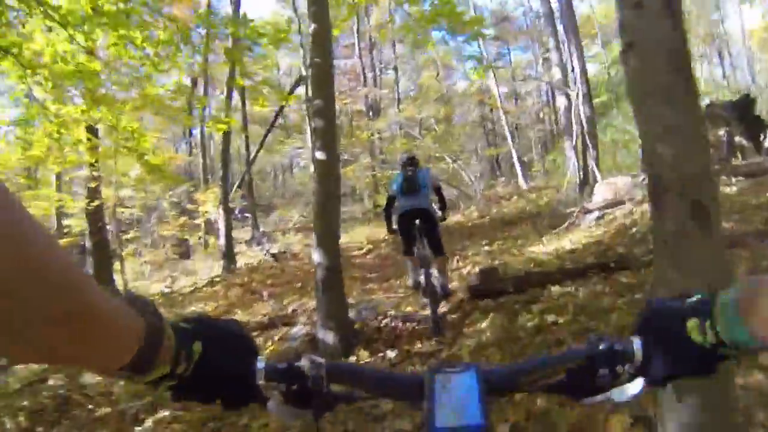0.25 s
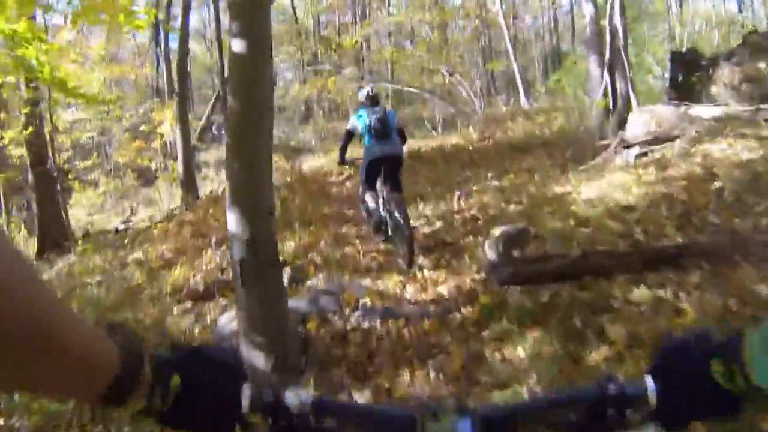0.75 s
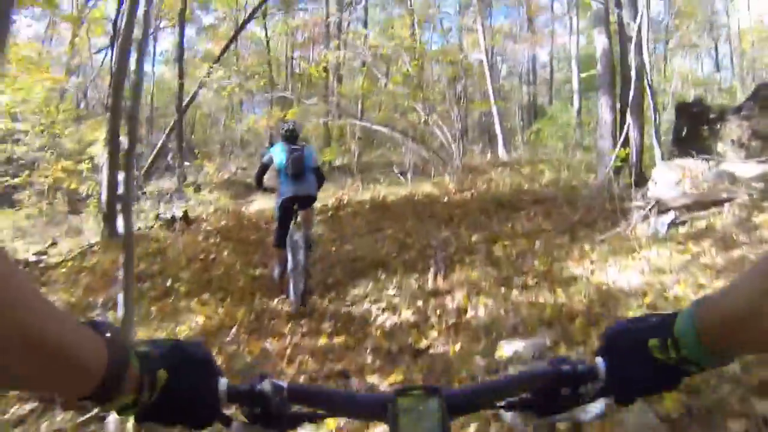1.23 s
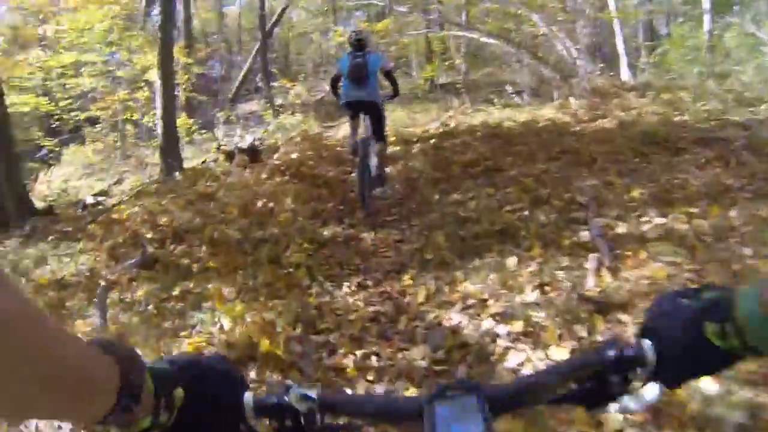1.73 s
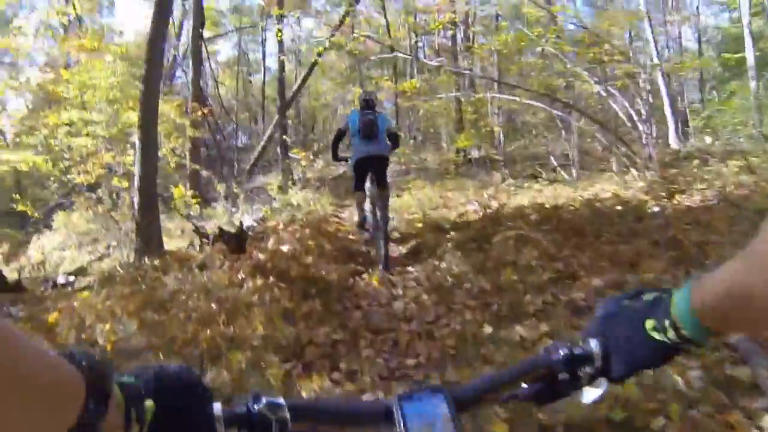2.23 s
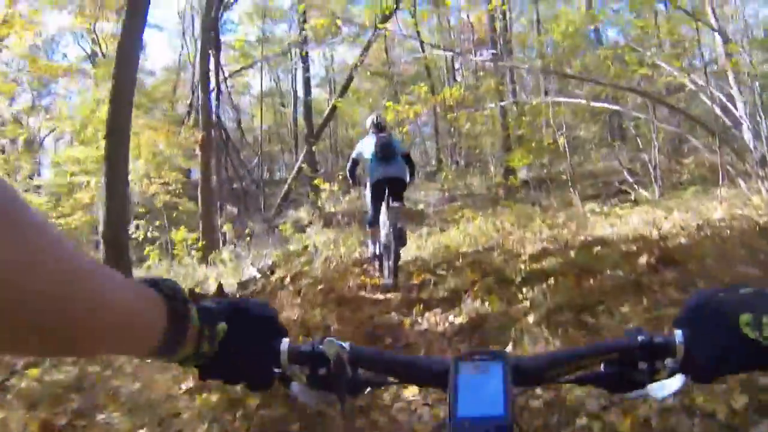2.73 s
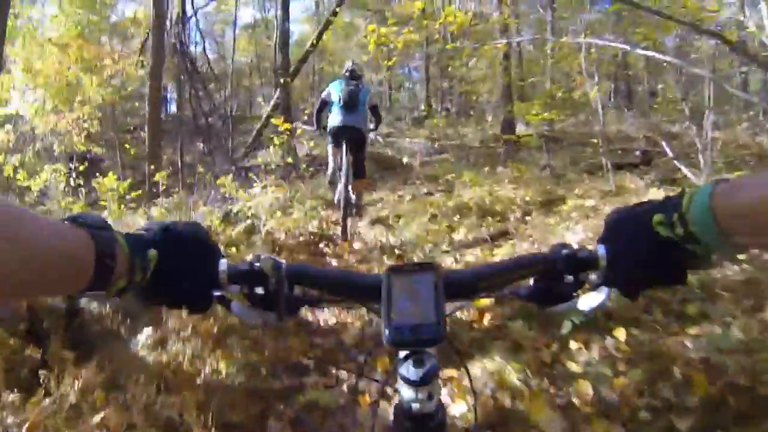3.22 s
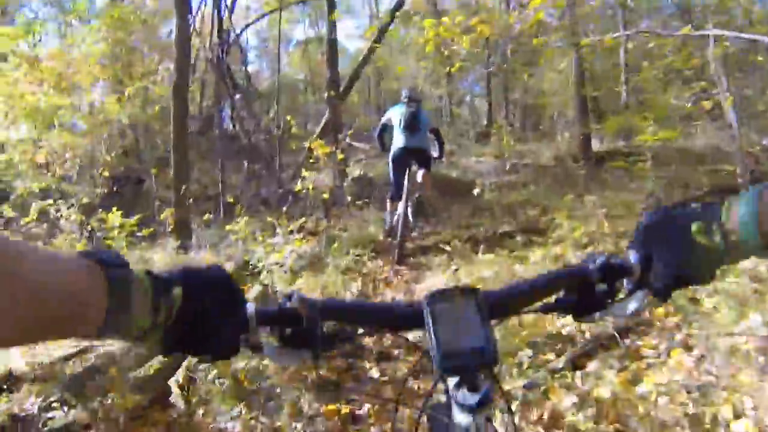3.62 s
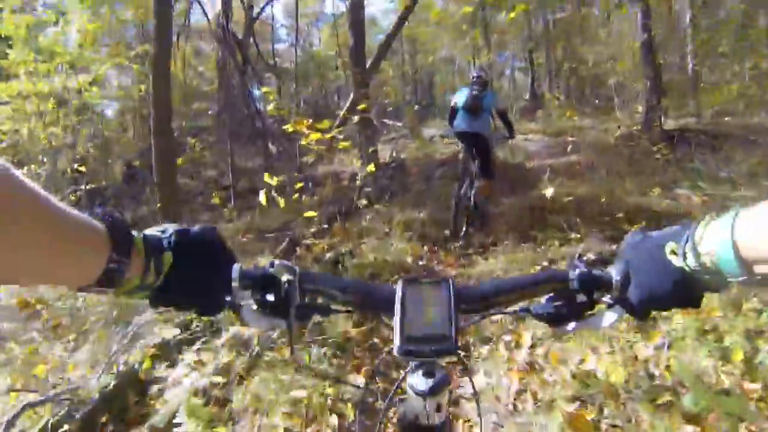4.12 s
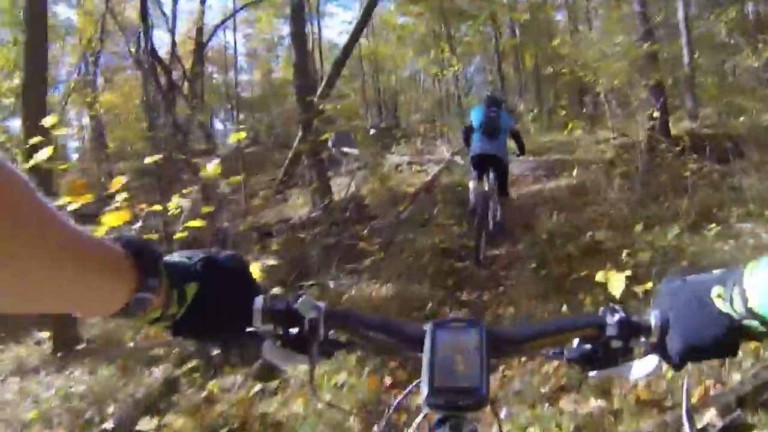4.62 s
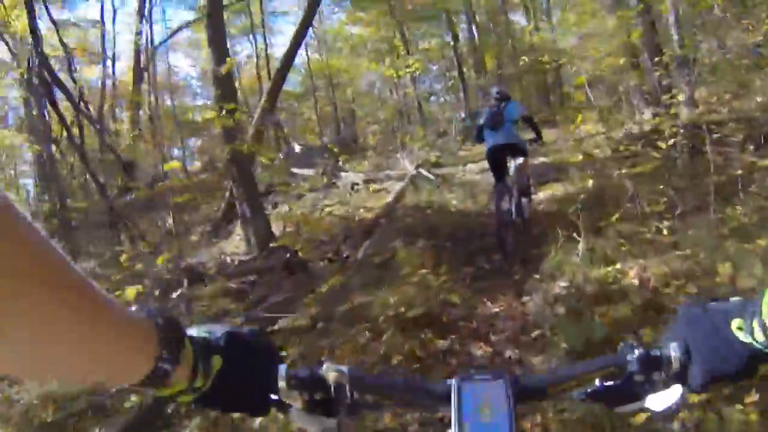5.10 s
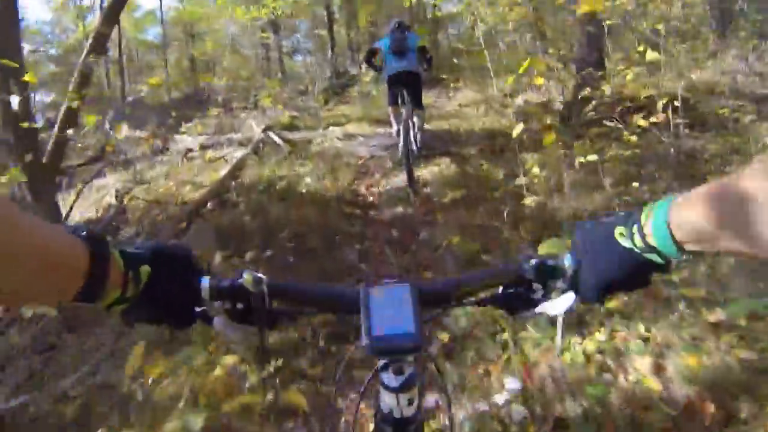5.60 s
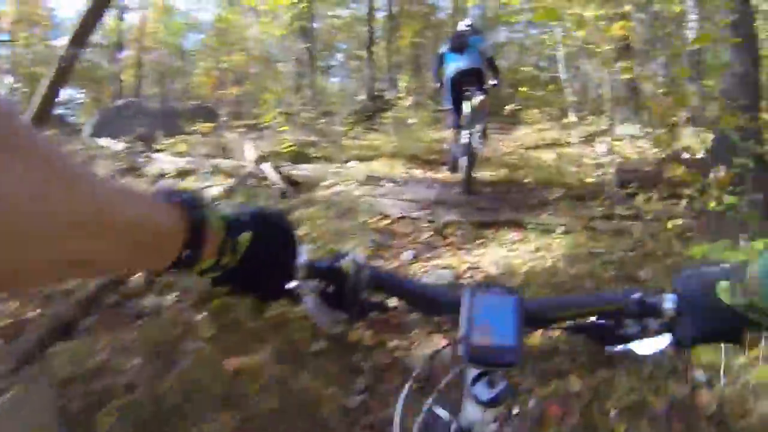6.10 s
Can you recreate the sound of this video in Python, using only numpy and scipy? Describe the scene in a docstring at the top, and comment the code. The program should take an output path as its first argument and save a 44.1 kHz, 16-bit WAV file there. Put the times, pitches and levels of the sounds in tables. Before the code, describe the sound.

A bike ride on a leafy forest trail heard from a closed housing: deep thuds, rumbling tyres, muffled leaf crunch and irregular plasticky knocks.

```python
"""Heavy shaking and jolts dominate throughout, over a bed of leaf crunch, as a mountain bike rolls along a trail.
The microphone sits in a closed camera housing on the rider's chest: filtered noise sways it, bumps push it.
Noise rumbles for the tyres and crackles for the leaves; knocks are noise bursts with dull thumps below them.
The housing's resonances colour leaves and knocks; a faint whine and hiss lie beneath.
Peaks over a threshold make the gain control duck, and the extreme treble is cut."""
import sys
import numpy as np
from scipy import signal
from scipy.io import wavfile

SR = 44100
rng = np.random.default_rng(int(sys.argv[2]) if len(sys.argv) > 2 else 0)


def pcm_store(signal):
    """Save signal as 16-bit PCM."""
    levels = np.round(np.clip(np.atleast_2d(signal), -1, 1) * 32767)
    wavfile.write(sys.argv[1], SR, levels.astype(np.int16).T)


N = 280035

# jolts of the housing: start_s (centre of the push), level_db (before the rebound is taken off),
# width_ms (nominal time scale), direction (sign of the push)
BUMPS = [(0.047, -8, 18.7, -1), (0.234, -6, 12.2, 1), (0.299, -10.5, 9.1, 1), (0.525, -7, 22.5, -1),
         (0.603, -4, 13, -1), (1.063, -4, 15, -1), (1.16, -9.5, 24.5, -1), (1.379, -6.5, 14.7, 1),
         (1.58, -7, 18, -1), (1.65, -6, 14, -1), (1.705, -10, 26, 1), (1.743, -3.5, 12, -1),
         (2.021, -14.5, 7.2, 1), (2.047, -4, 19.4, -1), (2.148, -4, 18, -1), (2.315, -10, 21.5, -1),
         (2.503, -4, 19.8, 1), (2.607, -7.5, 23, -1), (2.703, -7, 21, -1), (2.885, -3, 9.2, 1),
         (3.187, -7.5, 21.4, -1), (3.269, -10, 7.4, -1), (3.41, -3, 14.8, -1), (3.641, -6.5, 10.6, 1),
         (3.895, -9, 20.5, -1), (4.023, -4.5, 14, 1), (4.166, -13, 27, 1), (4.389, -7.5, 5.3, 1),
         (4.448, -5.5, 19, -1), (4.705, -5.5, 20, -1), (4.766, -7.5, 16.7, -1), (4.886, -4, 20, -1),
         (4.983, -7, 20.7, -1), (5.039, -6.5, 14, -1), (5.084, -5, 13.7, 1), (5.176, -4.5, 11.8, -1),
         (5.668, -8.5, 18.3, 1), (5.772, -4.5, 12, -1), (5.924, -3.5, 11.6, 1), (5.983, -5, 15, 1),
         (6.087, -9, 17, -1), (6.299, -6.5, 13.5, 1), (6.331, -3.5, 18.4, 1)]


def from_db(db):
    """Amplitude factor of a level in dB."""
    return 10 ** (np.asarray(db) / 20)


def rms_one(x):
    """Scale to an rms of 1."""
    return x / np.sqrt(np.mean(x ** 2) + 1e-20)


def band(x, low_hz, high_hz, order=2):
    """Butterworth band-pass."""
    sos = signal.butter(order, [low_hz, high_hz], "band", fs=SR, output="sos")
    return signal.sosfilt(sos, x)


def lowpass(x, cutoff_hz):
    """Second-order Butterworth low-pass."""
    return signal.sosfilt(signal.butter(2, cutoff_hz, fs=SR, output="sos"), x)


def noise_band(low_hz, high_hz, order=2):
    """Band of noise with rms 1, taken after a one-second run-in."""
    return rms_one(band(rng.standard_normal(N + SR), low_hz, high_hz, order)[SR:])


def drift(rate_hz):
    """Slow random wander of rms 1: noise through two equal one-pole low-passes."""
    r = np.exp(-2 * np.pi * rate_hz / SR)
    noise = rng.standard_normal(N + SR)
    return rms_one(signal.lfilter([1], [1, -2 * r, r * r], noise)[SR:])


def resonance(x, hz, width_hz):
    """One ringing mode: a two-pole resonator that dies faster the wider it is."""
    r = np.exp(-np.pi * width_hz / SR)
    b = [(1 - r * r) / 2, 0, (r * r - 1) / 2]
    a = [1, -2 * r * np.cos(2 * np.pi * hz / SR), r * r]
    return signal.lfilter(b, a, x)


def humps(times_s, heights, half_s):
    """Bell-shaped rises or dips at given times, added up on a coarse time grid."""
    grid_s = np.arange(0, N + 100, 100) / SR
    bells = np.exp(-((grid_s - np.array(times_s)[:, None]) / half_s) ** 2)
    return np.interp(np.arange(N) / SR, grid_s, np.dot(heights, bells))


def rough_ground():
    """Rough ground around each jolt: -0.5 on smooth stretches, up to +0.5 where jolts crowd."""
    starts_s = [row[0] for row in BUMPS]
    return np.tanh(humps(starts_s, np.ones(len(BUMPS)), half_s=0.045)) - .5


def shaking(level_db, travel=0.42):
    """The rider's chest and the mount sway and judder at low frequencies; the straps limit the travel."""
    sway = noise_band(6.2, 28.1, order=3)
    judder = 0.34 * noise_band(22.0, 35.5)
    free = from_db(level_db - 0.5) * rms_one(sway + judder)
    return lowpass(travel * np.tanh(free / travel), 45)


def jolts():
    """Each bump is one push with a rebound on both sides, as the leaky housing evens the pressure.
    The straps pull tight for that moment: slack (0-1) is what is left for the free shaking."""
    out, slack, t = np.zeros(N), np.ones(N), np.arange(N) / SR
    for start_s, level_db, width_ms, direction in BUMPS:
        near = slice(max(round((start_s - .1) * SR), 0), round((start_s + 0.065) * SR))
        u = (t[near] - start_s) / (width_ms / 1000)
        rebound = 0.31 * np.exp(-(u / 2.25) ** 2)
        push = np.exp(-(u / 0.63) ** 2) - rebound
        out[near] += np.sign(direction) * from_db(level_db) * push
        slack[near] *= 1 - np.exp(-(u / 1.44) ** 2)
    return out, slack


def rumble(level_db):
    """Knobbly tyres on dirt and roots: lumpy low noise, each band with lumps of its own on shared ones."""
    shared_db = 3.23 * drift(27.6)
    low = from_db(shared_db + 2.6 * drift(29)) * noise_band(70.0, 112.6)
    middle = from_db(-6.0 + shared_db + 2.7 * drift(42)) * noise_band(108.4, 195.0)
    high = from_db(-17.0 + shared_db + 1.5 * drift(21)) * noise_band(179, 530)
    return from_db(level_db) * rms_one(low + middle + high)


def crackle(mean_per_s, spread_db):
    """Leaves break at random, in clumps, on a bed of rustle; mean_per_s is the rate before clumping."""
    sizes = from_db(spread_db * np.minimum(rng.exponential(1, N), 5)) * rng.choice([-1, 1], N)
    clumped_per_s = mean_per_s * from_db(7 * drift(20))
    breaks = rng.random(N) < clumped_per_s / SR
    rustle = 1.2 * rng.standard_normal(N)
    return rms_one(rms_one(sizes * breaks) + rustle)


def leaves(crunch_db, crisp_db):
    """Leaf litter driving the housing: dull and crisp parts swell together as the wheels plough through heaps."""
    # heaps of leaves: start_s (centre), crunch_change_db, crispness_change_db
    heaps = [(0.27, 4, 0.5), (0.51, 6, 0), (0.782, 4.5, -0.5), (1.01, 3, 2), (1.27, 2.5, 1), (1.5, 4.5, 2),
             (1.934, 3, -2), (2.05, 8, -2.5), (2.39, 1, 2), (2.57, 5, -3.5), (2.71, -1.5, 5), (2.851, 4, 2),
             (3.28, 1, 6), (3.6, 2, 2), (3.72, 4.5, -0.5), (3.98, 6.5, -2), (4.33, 1, 9), (4.45, 4, 4.5),
             (4.673, 4, 3), (5.01, 3, -2), (5.27, 4.5, -7), (5.4, 1.5, 2.5), (5.83, -1.5, 2.5),
             (6.2, 0.5, -1.5)]
    heap_s, crunch_change_db, crisp_change_db = np.transpose(heaps)
    half_s = 0.037  # half-length of a heap under the wheel
    crunch_db = crunch_db + humps(heap_s, crunch_change_db, half_s)
    crisp_db = crisp_db + humps(heap_s, crisp_change_db, half_s)
    swell = from_db(crunch_db + 13.0 + 0.13 * drift(68))
    dull = lowpass(crackle(700, spread_db=3.5), 4500)
    crisp = from_db(crisp_db + 28.5) * crackle(2500, spread_db=5.0)
    return swell * dull, swell * crisp


def housing(dull, crisp, wander_db=0, struck=False):
    """Parallel resonances; the low ones take the dull drive, the high ones the crisp drive.
    A source that moves about favours now one resonance, now another."""
    # resonances of the housing: pitch_hz, width_hz, air_level_db (through the air),
    # struck_db (added for knocks through the mount)
    modes = [(550, 310, -17, -2.5), (833, 71, -5, 0.5), (1110, 126, -4.5, -2), (1290, 118, 2.5, -4.5),
             (1530, 227, 2, -5), (2230, 167, 1, 4.5), (3010, 390, -6.5, 3.5), (3440, 119, -4.5, 4),
             (3760, 1320, -13.5, 4.5), (5037, 143, -4.5, 5), (5757, 250, -10.5, -4), (6500, 280, -17.5, 0),
             (7340, 710, -20, 1), (8270, 350, -17.5, 4), (9900, 2450, -28.5, 3), (12700, 4800, -57, -5)]
    treble_hz = 4300  # modes above take the crisp drive
    out = np.zeros(N)
    for k, (pitch_hz, width_hz, air_level_db, struck_db) in enumerate(modes):
        level_db = air_level_db + struck * struck_db + wander_db * drift(27.0)
        drive = crisp if pitch_hz > treble_hz else dull
        out += (-1) ** k * resonance(from_db(level_db) * drive, pitch_hz, width_hz)  # alternating polarity
    return out


def whine():
    """The camera's electronics: steady sines about 60 Hz apart, the lines of a whine chopped at the picture rate."""
    # lines of the whine: pitch_hz, level_db (rms)
    lines = [(13786.2, -89), (13846.1, -84), (13906.1, -75), (13966.0, -87), (14026.0, -88), (14085.9, -94)]
    t = np.arange(N) / SR
    out = np.zeros(N)
    for pitch_hz, level_db in lines:
        out += np.sqrt(2) * from_db(level_db) * np.sin(2 * np.pi * (pitch_hz * t + rng.random()))
    return out


def hiss():
    """The microphone's own noise, only in the high treble."""
    return from_db(-71.5) * noise_band(10000, 22000)


def knocks():
    """Each contact is a sharp blow with a dying rattle around its own pitch: the part rings, it drives the housing,
    thumps the mount and, when hard, rings the clasp."""
    # knocks of straps and frame: start_s, level_db (before each path's trim), pitch_hz,
    # contact_ms (decay time constant), treble_db (against level_db), thump_db (before the trim)
    contacts = [(0.13, -33, 890, 4.4, -22, -30), (0.13, -32.5, 275, 9.1, -30, -50),
                (0.213, -43, 920, 5, -10, -30), (0.366, -32.5, 910, 3.3, -20, -32.5),
                (0.438, -40, 1510, 33, -12, -38), (0.486, -50, 1000, 4, -10, -31),
                (0.782, -27.5, 2470, 3.7, -5, -28), (0.928, -30, 2710, 5.3, -20, -50),
                (0.929, -22.5, 1600, 1.5, -25, -23), (0.931, -29.5, 438, 3.4, -30, -52),
                (0.939, -31, 2400, 3.4, -12.5, -27), (0.945, -34, 1700, 3, -15, -45),
                (0.991, -21.5, 1470, 2.5, 7.5, -33.5), (1.003, -19.5, 3020, 0.97, 4, -38),
                (1.003, -31, 1440, 2.8, -20, -53), (1.346, -30, 960, 4.7, -14, -37.5),
                (1.362, -44, 890, 6.2, -13, -39), (1.508, -35.5, 1480, 4.9, 0, -35),
                (1.537, -37, 1570, 4.3, -7, -26), (1.54, -37, 417, 4.9, -30, -55),
                (1.711, -31, 3150, 5.3, -11, -33.5), (1.716, -22.5, 2160, 4.5, -8, -54),
                (1.721, -29, 2250, 4.8, -7, -32.5), (1.729, -34, 1450, 3.6, -12, -50),
                (1.758, -20, 3100, 1.6, 4, -38), (1.759, -24.5, 1510, 2.5, -15, -50),
                (1.764, -22.5, 3140, 3.5, 5, -43), (2.006, -21.5, 1680, 1.7, -20, -24.5),
                (2.007, -18.5, 340, 2.6, -40, -55), (2.029, -18, 2740, 2.85, -30, -23.5),
                (2.031, -23, 860, 8.2, -21, -17.5), (2.037, -29, 840, 4.6, -20, -41),
                (2.049, -29, 2200, 4.3, -16, -28), (2.07, -29, 2050, 2.4, 4, -29.5),
                (2.159, -39, 690, 3.1, -5, -36.5), (2.21, -43, 840, 6.5, -6, -69),
                (2.295, -36.5, 2380, 6.9, 1, -47), (2.45, -35.5, 1160, 9.4, -3, -27.5),
                (2.553, -41, 1420, 3.8, 12, -34), (2.703, -39.5, 875, 5.5, -10, -33.5),
                (2.806, -37, 2040, 3.7, -12, -34), (2.841, -36, 1530, 3.4, -6, -45),
                (2.937, -51, 900, 3, -10, -30.5), (3.021, -39, 870, 6.7, -15.5, -35.5),
                (3.22, -37, 1100, 4.2, -5, -33.5), (3.282, -40, 2860, 4.2, -5, -31),
                (3.344, -20, 3050, 1.23, 7.5, -57), (3.344, -21, 2070, 3.1, -18, -50),
                (3.373, -37, 1690, 2, -20, -50), (3.376, -35.5, 870, 7.6, -12, -30),
                (3.466, -32.5, 1060, 10, -20, -34), (3.553, -29, 1810, 1.3, -14, -33.5),
                (3.649, -33.5, 1800, 4.5, -14, -27.5), (3.727, -40.5, 850, 7, -12, -32.5),
                (3.871, -37.5, 950, 4.8, -12, -34.5), (3.986, -41, 1030, 3.5, -10, -27.5),
                (3.996, -30.5, 1960, 6.5, -18, -31), (4.075, -21.5, 2260, 3.5, -30, -30),
                (4.248, -31, 2230, 8.4, -22, -27.5), (4.385, -41, 804, 6.9, -8, -25),
                (4.399, -33, 1960, 11, -6, -24.5), (4.409, -32, 2980, 2.8, -10, -50),
                (4.411, -27.5, 990, 4.3, -12, -18.5), (4.453, -39, 840, 17, -13, -32),
                (4.574, -31.5, 1370, 2.8, -1, -40), (4.584, -34.5, 1110, 5.2, -4, -56),
                (4.664, -45, 1500, 4, -5, -44), (4.69, -39, 990, 8.5, -6, -29),
                (4.791, -38, 885, 6.2, -15, -34), (4.816, -32, 1330, 4.8, -2.5, -52),
                (4.881, -38.5, 860, 25, -1.5, -51), (4.916, -25, 950, 0.83, -19, -42),
                (4.928, -27.5, 1380, 2, -18, -36), (4.94, -29, 2300, 6.1, -18, -38),
                (5.003, -36.5, 1860, 6.7, 6, -55), (5.011, -32.5, 1380, 7.2, -8, -30.5),
                (5.058, -29.5, 1460, 3.6, -20, -39), (5.155, -32, 2330, 4.6, -1, -28.5),
                (5.216, -36, 1010, 4, -12, -33), (5.269, -39, 1380, 11, 4.5, -33),
                (5.287, -38, 3100, 4.6, -10, -50), (5.291, -26, 1410, 5.6, -20, -26.5),
                (5.317, -40, 1000, 3.7, -12, -37), (5.49, -48, 1020, 21, -14, -29),
                (5.574, -53, 800, 4.3, -10, -35), (5.652, -40, 810, 5.4, -10, -38),
                (5.823, -34, 2340, 15, -14, -37.5), (5.907, -34, 1290, 34, -13, -30),
                (5.983, -41, 885, 4.7, -8, -37.5), (6.076, -34, 1500, 2.6, -15, -39),
                (6.092, -34.5, 970, 3.7, -13, -33), (6.249, -51, 590, 1.6, -10, -29)]
    length = 4000  # samples
    thump_hz, thump_hz_per_db = 94.5, 2.5  # mount pitch at -35 dB and its rise with force, before the contact factor
    usual_contact_ms = 3.53  # shorter contacts than this raise the thump's pitch
    thump_rise, thump_decay = 0.15, 0.52  # cycles
    body_db, body_sharpness = 2.5, 8  # level added to level_db; pitch over width
    body_width_hz = 207  # no knock rings narrower than this
    dull, crisp, hard, thump, body = np.zeros((5, N + length))
    t = np.arange(length) / SR
    for row, grit in zip(contacts, rng.standard_normal((len(contacts), 2, length))):
        start_s, level_db, pitch_hz, contact_ms, treble_db, thump_db = row
        start = round(start_s * SR)
        span = slice(start, start + length)
        fading = np.exp(-1000 * t / contact_ms)
        blow = 3.8 * (t == 0)
        pitched = band(grit[0] + blow, pitch_hz / 3.5, pitch_hz * 1.124)
        burst = np.array([pitched, grit[1] + blow]) * fading
        # give every burst the energy of its fading envelope
        burst = burst / np.sqrt((burst ** 2).sum(axis=1, keepdims=True) / (fading ** 2).sum())
        dull[span] += from_db(level_db - 1.0) * burst[0]
        width_hz = max(pitch_hz / body_sharpness, body_width_hz)
        body[span] += from_db(level_db + body_db) * resonance(burst[0], pitch_hz, width_hz)
        crisp[span] += from_db(level_db + 6.5 + treble_db) * burst[1]
        # steep slope: soft knocks hardly stir the clasp
        hard_db = 2.73 * (level_db + treble_db) + 30.5
        hard[span] += from_db(hard_db) * (burst[1] + 2.25 * (t == 0))
        # harder and shorter blows raise the mount's pitch
        force_hz = thump_hz + thump_hz_per_db * (thump_db + 35)
        cycles = force_hz * (usual_contact_ms / contact_ms) ** 0.11 * t
        # the mount's two lowest modes
        swing = np.sin(2 * np.pi * cycles) + 0.053 * np.sin(2 * np.pi * 2.31 * cycles)
        envelope = np.exp(-cycles / thump_decay) * (1 - np.exp(-cycles / thump_rise))
        thump[span] -= from_db(thump_db + 13.5) * envelope * swing
    return dull[:N], crisp[:N], hard[:N], thump[:N], body[:N]


def clasp(hard):
    """Hard parts ring on after a sharp knock; a resonance 2.2 / t60 wide dies by 60 dB in t60."""
    # pitches of the ringing parts: pitch_hz
    pitches_hz = [2220, 3080, 3900, 4730, 5040, 5210, 7230]
    # one row for each pitch: level_db, t60_s
    rings = [(-3, 0.035), (0.5, 0.036), (-5, 0.28), (-16, 0.05), (-0.5, 0.067), (-3, 0.085), (-14, 0.035)]
    out = np.zeros(N)
    for pitch_hz, (level_db, t60_s) in zip(pitches_hz, rings):
        out += from_db(level_db) * resonance(hard, pitch_hz, 2.2 / t60_s)
    return out


def scene():
    """The ride: ground shaking straight at the microphone, leaves and knocks through the housing."""
    # course of the ride, before rough ground, heaps and trims: start_s, shake_db (slow shaking),
    # rumble_db (tyres), crunch_db (leaves), crisp_db (crispness of the leaves)
    ride = [(0, -23, -42, -45.5, -27), (0.45, -16, -39.5, -49, -27.5), (0.75, -13.5, -34, -46.5, -29),
            (1.1, -20, -36.5, -48, -28), (1.45, -10.5, -38.5, -48.5, -29), (1.75, -21.5, -37.5, -50.5, -29),
            (1.9, -18.5, -31.5, -44.5, -29), (2.2, -21, -40.5, -48.5, -28.5), (2.8, -16.5, -40.5, -47, -30),
            (3.05, -20.5, -41, -50.5, -28), (3.45, -16.5, -34.5, -48, -32.5), (3.8, -19, -35, -50.5, -27.5),
            (4.22, -19.5, -41, -50.5, -30.5), (4.5, -14.5, -36, -50, -32), (5.1, -14.5, -37, -48, -29),
            (5.45, -15.5, -37.5, -48, -28), (5.9, -20, -35, -48, -30), (6.35, -15.5, -39, -48, -25.5)]
    start_s, *columns = np.transpose(ride)
    t = np.arange(N) / SR
    shake_db, rumble_db, crunch_db, crisp_db = [np.interp(t, start_s, c) for c in columns]

    rough = rough_ground()
    pushes, slack = jolts()
    shake = slack * shaking(shake_db + 12 * rough)
    ground = shake + pushes + rumble(rumble_db + 7 * rough)

    litter = housing(*leaves(crunch_db, crisp_db), wander_db=2.0)
    electronics = whine() + hiss()
    knock_dull, knock_crisp, knock_hard, thump, body = knocks()
    struck = housing(knock_dull, knock_crisp, struck=True) + body + clasp(knock_hard)
    return (ground + thump + litter + struck + electronics)[None]


def record(dry, threshold_db=-8.5, slope=3.92, release_db_per_s=90, attack_s=0.0026):
    """Peaks over the threshold pull the gain down a moment late; it climbs back steadily. The top is cut."""
    over_db = np.maximum(20 * np.log10(np.abs(dry) + 1e-9) - threshold_db, 0)
    climb_db = release_db_per_s * np.arange(N) / SR
    held_db = np.maximum.accumulate(slope * over_db + climb_db, axis=1) - climb_db
    r = np.exp(-1 / (attack_s * SR))
    # two smoothing stages delay the duck
    duck_db = signal.lfilter([(1 - r) ** 2], [1, -2 * r, r * r], held_db)
    ducked = dry * from_db(-duck_db)
    top_cut = signal.ellip(10, .5, 70, 15250, fs=SR, output="sos")  # low-pass edge in Hz
    return signal.sosfilt(top_cut, ducked)


dry = scene()
out = record(dry)
pcm_store(out)
```